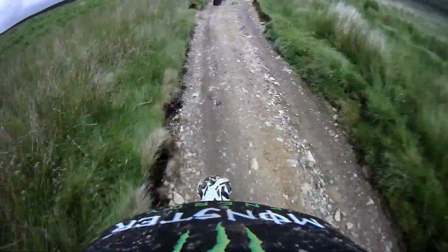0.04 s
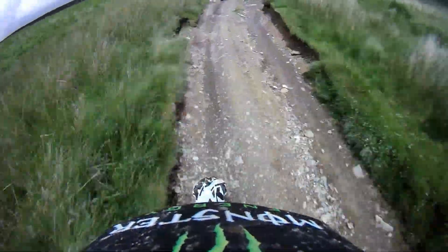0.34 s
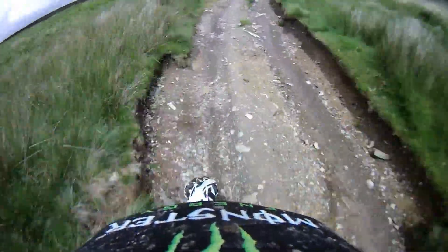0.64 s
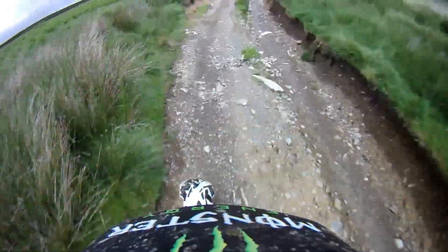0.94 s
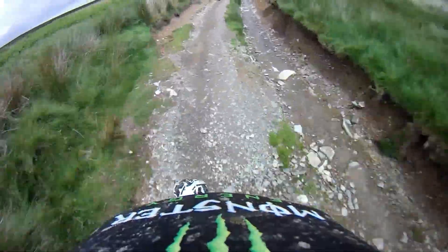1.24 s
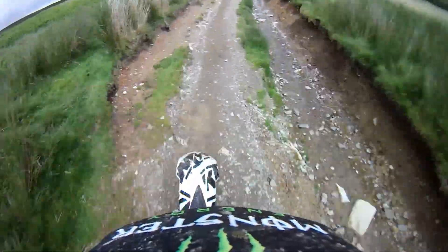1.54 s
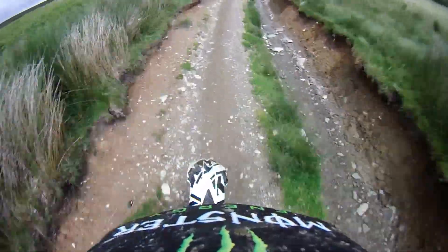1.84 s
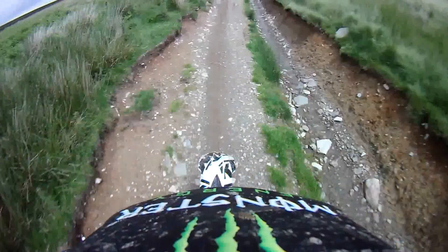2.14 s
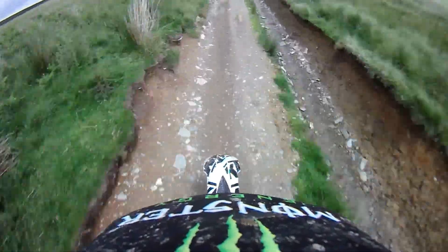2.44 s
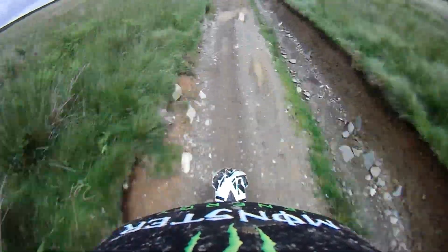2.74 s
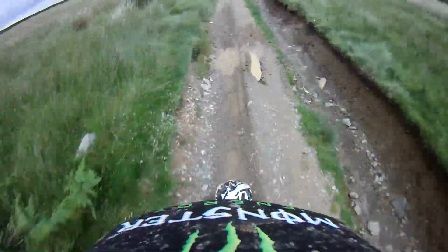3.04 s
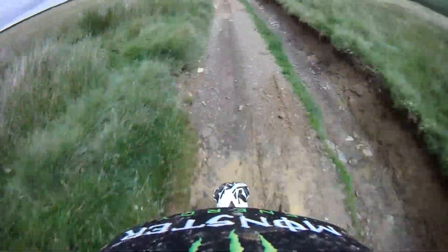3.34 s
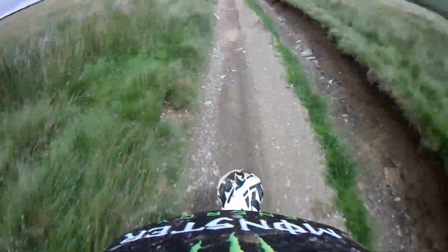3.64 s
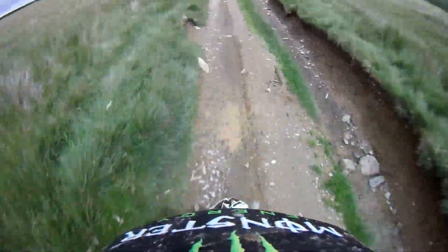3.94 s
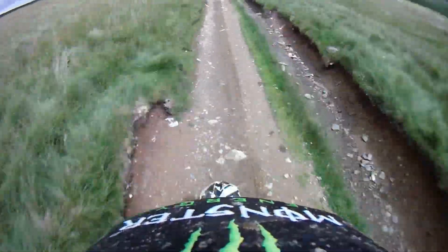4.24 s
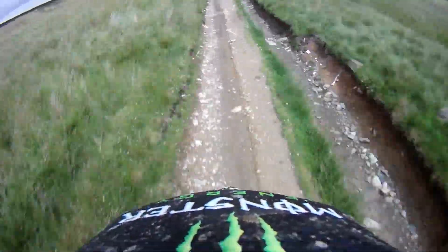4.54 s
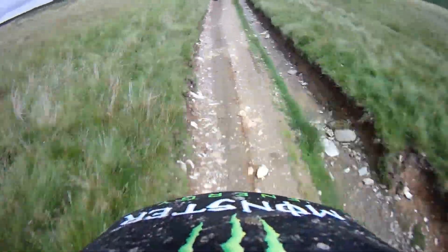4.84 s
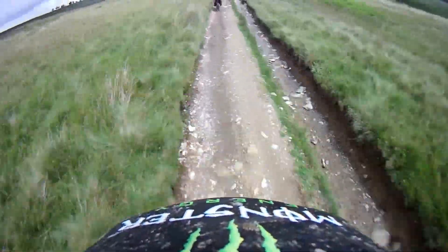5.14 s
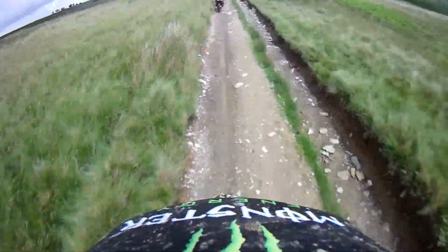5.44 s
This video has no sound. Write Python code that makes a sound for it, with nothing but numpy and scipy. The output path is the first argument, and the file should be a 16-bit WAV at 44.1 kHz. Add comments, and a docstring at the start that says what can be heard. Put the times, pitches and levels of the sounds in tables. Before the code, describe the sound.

A dirt bike engine coasts and growls through bursts of throttle, rattling over gravel with stone strikes and wind on the microphone.

```python
"""A single-cylinder four-stroke dirt bike rides down a gravel track, heard from the rider's helmet.
It coasts, takes two bursts of throttle and a small third one. One gas pulse per engine cycle drives
the resonances of exhaust and air box, which growl under the clatter of valve gear, piston and gears.
Impacts make the rest of the bike's noise: it rattles over rough ground, and stones and grit strike it.
Turbulent wind hisses and buffets the microphone."""
import sys
import numpy as np
from scipy import signal
from scipy.fft import rfft, irfft
from scipy.io import wavfile
from scipy.ndimage import uniform_filter1d

SR = 44100
rng = np.random.default_rng(int(sys.argv[2]) if len(sys.argv) > 2 else 0)


def store_wav(level_fs):
    """Save 16-bit WAV to argv[1]."""
    pcm = np.round(np.clip(np.atleast_2d(level_fs), -1, 1) * 32767)
    wavfile.write(sys.argv[1], SR, pcm.T.astype(np.int16))


N = 246519
TIME = np.arange(N) / SR
CRUISE_HZ = 47.9  # firing rate at cruising speed
GRIP_TWIST_S = 0.13

# engine speed: time_s, firing_rate_hz
FIRING_RATE = [(0, 44.1), (.3, 42.8), (.5, 41.3), (.8, 39.6), (1.0, 38.3), (1.2, 36.8), (1.4, 37.3),
               (1.68, 38.5), (1.782, 48.9), (1.845, 53), (1.926, 48.6), (2.005, 46), (2.106, 49.4),
               (2.182, 47.8), (2.3, 49.7), (2.42, 50.2), (2.5, 46.2), (2.62, 43), (2.8, 43.6), (3.22, 43),
               (3.32, 41.7), (3.45, 39.2), (3.75, 38), (3.85, 42.7), (3.914, 48.8), (4.01, 58),
               (4.085, 53.3), (4.32, 51.9), (4.398, 49.2), (4.478, 51.9), (4.616, 51.1), (4.76, 47),
               (4.95, 45.3), (5.11, 45), (5.2, 47.6), (5.3, 51), (5.42, 48.6), (5.59, 50)]


def amp(db):
    """Decibels to amplitude ratio."""
    return 10 ** (np.asarray(db) / 20)


def unit_rms(x):
    """Normalisation to an overall rms of 1."""
    return x / np.sqrt(np.mean(x ** 2) + 1e-20)


def steadied(x, size=2200):
    """Normalisation to a running rms of 1."""
    return x / np.sqrt(uniform_filter1d(uniform_filter1d(x ** 2, size), size) + 1e-12)


def coloured(x, spectrum, size=8192):
    """Minimum-phase filtering: each peak of the spectrum rings after the blow that excites it."""
    hz, db = np.transpose(spectrum)
    f = abs(np.fft.fftfreq(size, 1 / SR))
    log_gain = np.log(amp(np.interp(np.log(f + 1), np.log(hz), db)))
    response = np.exp(np.conj(signal.hilbert(log_gain)))
    ring = np.fft.ifft(response).real[:size // 2]
    return signal.oaconvolve(x, ring)[:len(x)]


def wander(rate_hz):
    """Slow random modulation: low-passed noise of rms 1."""
    f = np.fft.rfftfreq(N, 1 / SR)
    return unit_rms(irfft(rfft(rng.standard_normal(N)) * np.exp(-(f / rate_hz) ** 2), N))


def grains(per_s, spread_db):
    """Shot noise: tiny impacts of random time, sign and size."""
    size = amp(spread_db * np.minimum(rng.exponential(1, N), 4))
    return unit_rms(size * rng.choice([-1, 1], N) * (rng.random(N) < per_s / SR))


def add(mix, start_s, sound):
    """Superposition of a sound on the mix."""
    part = mix[round(start_s * SR):][:len(sound)]
    part += sound[:len(part)]


def curve(rows):
    """Linear interpolation through rows of time_s, value."""
    return np.interp(TIME, *np.transpose(rows))


def ramp(start_s, length_s):
    """A raised-cosine step from 0 to 1."""
    return np.sin(np.pi / 2 * np.clip((TIME - start_s) / length_s, 0, 1)) ** 2


def rise_and_fade(start_s, rise_s, fade_s):
    """A smooth onset with exponential decay."""
    return ramp(start_s, rise_s) * np.exp(-np.maximum(TIME - start_s, 0) / fade_s)


def swells(rows):
    """Gaussian rises and dips of level, in dB."""
    return sum(db * np.exp(-((TIME - middle_s) / half_s) ** 2) for middle_s, half_s, db in rows)


def crank(waver=0.005):
    """Phase is the integral of frequency: the cycle count of a crank that turns slightly unevenly."""
    return np.cumsum(curve(FIRING_RATE) * (1 + waver * wander(25.5))) / SR


def bursts():
    """Each burst of throttle is an envelope on exhaust and air box; hotter gas tunes the pipe higher."""
    # open_s, shut_s, closing_s, load_db, air_draw_db, boom_hold_s, pipe_build_s, pipe_pitch_ratio
    twists = [(1.365, 1.644, 0.17, -10, -14, .17, 2.6, .9), (1.634, 2.286, 0.27, -0.5, 2, 0.11, 1.2, 0.97),
              (3.788, 4.463, 0.22, -1.7, 0.5, 0.13, 1.9, .96), (5.123, 5.601, .2, -8, -14, .03, 0.11, 0.98)]
    for open_s, shut_s, closing_s, load_db, draw_db, hold_s, build_s, tuning in twists:
        opening = ramp(open_s, GRIP_TWIST_S) * (1 - ramp(shut_s, closing_s))
        age = np.maximum(TIME - open_s, 0)
        yield opening, age, amp(load_db), amp(draw_db), hold_s, build_s, tuning


def throttle(surge_peak_s=0.19, surge_width_s=0.1):
    """Load follows the throttle opening, with a surge of strain soon after the grip turns."""
    opened, load, surge = np.zeros((3, N))
    for opening, age, pull, *_ in bursts():
        opened += opening
        load += opening * pull
        surge += opening * pull * np.exp(-((age - surge_peak_s) / surge_width_s) ** 2)
    return np.minimum(opened, 1), load, surge


def roughness(opened, surge, shut=0.36, pulling=0.12, surging=0.03, per_hz_lost=0.0099):
    """Cyclic variation: firing is ragged with the throttle shut, more so at low speed, cleaner when open."""
    slow = per_hz_lost * np.maximum(CRUISE_HZ - curve(FIRING_RATE), 0)
    return np.clip((shut + slow) * (1 - opened) + pulling * opened + surging * surge, 0, 1)


def strokes(cycles, rough, uneven_db=6, puff_cycles=0.48):
    """A pulse train gives harmonics; a puff of turbulent gas in each cycle adds noise."""
    pulses = np.diff(np.floor(cycles), prepend=np.floor(cycles[0]))
    pulses *= amp(uneven_db * rough * wander(29))
    puffs = np.exp(-(cycles % 1) / puff_cycles) * rng.standard_normal(N)
    return (1 - rough) * unit_rms(pulses) + rough * unit_rms(puffs)


def chamber(x, echo_s, bounce=0.23):
    """All-pass reverberation: echoes spread each pulse in time and leave its spectrum level unchanged."""
    delay = np.exp(-2j * np.pi * np.fft.rfftfreq(N, 1 / SR) * echo_s)
    return irfft(rfft(x) * (delay - bounce) / (1 - bounce * delay), N)


def intake(cycles, rough, opened, held_db=-48.5, boom_db=-35, boom_fade_s=0.16):
    """Cavity resonance: each gulp of air excites the air box, which booms as the throttle opens."""
    # air box resonance: frequency_hz, gain_db
    air_box = [(60, -60), (150, -30.5), (205, -14.5), (238, -3), (268, 8.5), (290, -1), (330, -11),
               (500, -49), (1500, -67.5), (10000, -100)]
    # intake with the throttle shut: time_s, level_db
    idle_air = [(.1, -49.5), (.3, -55.5), (.55, -50.5), (1.35, -48), (2.52, -50), (2.7, -50), (3.0, -56),
                (3.3, -51), (3.58, -50.5), (3.75, -61), (4.8, -58), (5.2, -56)]
    level = amp(curve(idle_air)) * (1 - opened)
    for opening, age, _, draw, hold_s, _, _ in bursts():
        boom = opening * np.exp(-(np.maximum(age - hold_s, 0) / boom_fade_s) ** 2)
        level += opening * draw * (amp(held_db) + amp(boom_db) * boom)
    gulps = chamber(strokes(cycles, 0.59 * rough), echo_s=0.00674)
    return level * steadied(coloured(gulps, air_box))


def exhaust(cycles, rough, opened, load, surge, silencer_s=0.00553, limp=0.15):
    """Source and filter: firings bark and rasp at once, ring the pipe, and thump out of the silencer."""
    # silencer's growl under load and drone when coasting: frequency_hz, gain_db
    growl_spectrum = [(45, -24), (70, -17), (88, 2.5), (108, 2.5), (150, -19), (198, 6), (255, 3),
                      (310, -11), (430, -16.5), (600, -18.5), (1500, -49.5), (5000, -85), (12000, -102)]
    drone_spectrum = [(45, 0.5), (85, 10.5), (128, 2.5), (172, -1), (215, 6.5), (270, 1.5), (380, -25),
                      (700, -54.5), (1500, -40.5), (9000, -76)]
    # bark under load, rasp under strain, hollow pipe resonance: frequency_hz, gain_db
    bark_spectrum = [(200, -24), (340, 7.5), (440, 4.5), (580, -5), (700, 0), (860, -4.5), (1080, -24),
                     (1450, -11.5), (1900, -34.5), (5000, -59), (12000, -89)]
    rasp_spectrum = [(200, -49), (380, 7), (480, 5.5), (580, -2), (700, 5), (850, -26), (1200, -10),
                     (1480, 7.5), (1900, -10.5), (4000, -32), (10000, -78)]
    pipe_spectrum = [(150, -21), (300, -7), (400, -32), (495, 10), (560, -13), (800, -25), (2000, -76)]
    # drone while coasting: time_s, level_db
    drone_level = [(0, -51.5), (.6, -48.5), (1.17, -42.5), (1.45, -51), (2.65, -46.5), (3.15, -46.5),
                   (3.55, -50), (4.85, -49), (5.4, -44.5)]
    firings = strokes(cycles, rough)
    push = amp(-54.5) * (1 - opened) + amp(-39.5 - 3 * surge) * load
    growl = push * steadied(coloured(chamber(firings, silencer_s), growl_spectrum))
    blasts = strokes(cycles, rough=0.15, uneven_db=9, puff_cycles=0.2)
    excess_hz = curve(FIRING_RATE) - CRUISE_HZ
    bark = amp(-48 + 0.25 * excess_hz) * load * steadied(coloured(blasts, bark_spectrum))
    turbulence = strokes(cycles, rough=0.5, puff_cycles=0.7)
    rasp = amp(-46) * surge * steadied(coloured(turbulence, rasp_spectrum))
    ring = np.zeros(N)
    for opening, age, *_, build_s, tuning in bursts():
        pipe = [(hz * tuning, db) for hz, db in pipe_spectrum]
        ring += amp(-58) * opening * np.minimum(age / build_s, 1) * steadied(coloured(firings, pipe))
    limping = chamber(firings * (1 + limp * np.cos(np.pi * cycles)), silencer_s)  # every second one weak
    drone = amp(curve(drone_level) - 9 * opened) * steadied(coloured(limping, drone_spectrum))
    return growl + bark + rasp + ring + drone


def jostle(swing_db=1.2, rate_hz=7):
    """Amplitude modulation: the engine's voice swells and dips as the track jostles the bike."""
    return amp(swing_db * wander(rate_hz))


def clatter(cycles, load, surge, overrun_s=2.42):
    """Impact noise modulated by the cycle: valve gear, piston and gears tick, and bite under load."""
    # ticking, bite under load, chatter of slack gears: frequency_hz, density_db
    tick_spectrum = [(300, -2.5), (720, 2.5), (900, -4), (1130, -11), (1570, 4.5), (1900, -11.5),
                     (2250, -9), (2530, 5.5), (2950, -0.5), (4250, -3), (4900, -1.5), (6100, -4.5),
                     (7400, -16.5), (11000, -29), (15500, -50)]
    bite_spectrum = [(300, -20), (750, -6.5), (1080, -8), (1550, 0.5), (1850, -4), (2250, -3.5),
                     (2600, 3.5), (2950, 2.5), (3500, -2.5), (4300, -6), (4950, -1), (6100, -5),
                     (7400, -16.5), (11000, -32.5), (15500, -41)]
    lash_spectrum = [(500, -35), (1150, -15), (1570, 8.5), (2000, -7), (2600, -7), (4000, -14), (6000, -3),
                     (7500, -18), (12000, -37)]
    angle = 2 * np.pi * cycles
    beat = 1 + 0.049 * np.cos(angle) + 0.046 * np.cos(2 * angle)  # once a cycle, once a crank turn
    ticks = grains(per_s=8000, spread_db=2) * beat * amp(1.4 * wander(21))
    ticking = amp(-50.5) * unit_rms(coloured(ticks, tick_spectrum))
    excess_hz = curve(FIRING_RATE) - CRUISE_HZ
    strain = load * amp(-47.5 + surge + 0.48 * excess_hz)
    bite = strain * unit_rms(coloured(grains(per_s=14000, spread_db=2) * beat, bite_spectrum))
    slack = rise_and_fade(overrun_s, GRIP_TWIST_S, fade_s=0.83)  # throttle shut: wheel drives engine
    lash = amp(-54) * slack * unit_rms(coloured(grains(per_s=1600, spread_db=-3), lash_spectrum))
    return ticking + bite + lash


def rattle(surge, clump_db=1.47, snatch_db=5):
    """Clustered impacts of chain and gravel, louder on rough ground and when the drive snatches."""
    # chain and gravel: frequency_hz, density_db
    spectrum = [(100, -1.5), (400, -6), (850, 3.5), (1200, 2.5), (1500, 5), (1950, 4), (2450, 8),
                (2850, 9.5), (3400, 2), (4500, -2), (6000, -9), (7500, -28), (12000, -49)]
    # rough (+) and smooth (-) ground: middle_s, half_length_s, change_db
    ground = [(.42, .07, 2), (.81, 0.046, 5), (.885, 0.018, -13), (1.0, 0.1, 7.5), (1.25, 0.36, 6),
              (2.65, .14, 3), (2.92, 0.14, -5), (3.42, 0.13, -15), (4.2, 0.036, 6.5), (4.59, 0.07, 6.5),
              (4.8, 0.13, 6), (5.1, 0.1, -4)]
    hits = grains(per_s=4400, spread_db=1.5) * amp(clump_db * wander(41))
    return amp(-53.5 + swells(ground) + snatch_db * surge) * unit_rms(coloured(hits, spectrum))


def wind(lump_db=2.5, flutter_db=0.6):
    """Turbulence: lumpy low-frequency pressure on the microphone, and a thin hiss round the helmet."""
    # buffet and hiss: frequency_hz, density_db
    buffet_spectrum = [(5, 4.5), (14, 7), (30, -1), (55, -8), (100, -15), (160, -18.5), (300, -14),
                       (700, -49), (2000, -78.5)]
    hiss_spectrum = [(200, 7.5), (650, -6), (1050, -15), (1600, -5), (3000, -6), (6000, -19.5),
                     (8000, -19.5), (11000, -35.5), (15500, -33)]
    # gusts (+) and lulls (-): middle_s, half_length_s, change_db
    gusts = [(.8, 0.25, -1), (1.16, 0.038, 5), (1.64, 0.1, 7), (1.87, 0.039, -4), (2.88, 0.14, -14.5),
             (3.58, 0.069, -1), (4.47, 0.21, 5.5), (5.03, 0.061, -4.5), (5.5, 0.09, 6.5)]
    buffet = steadied(coloured(rng.standard_normal(N), buffet_spectrum)) * amp(lump_db * wander(9.9))
    flutter = amp(flutter_db * wander(17))
    hiss = unit_rms(coloured(rng.standard_normal(N), hiss_spectrum)) * flutter
    return amp(-45 + swells(gusts)) * buffet + amp(-54) * hiss


def stones(size=4096):
    """Modal ringing: flung stones crack on the bike, and the heavier ones excite a plastic panel."""
    # close strikes: start_s, crack_db, ring_db
    strikes = [(0.5841, -30.5, -60), (0.5916, -41, -51), (2.6252, -43, -30), (3.218, -33.5, -16.5),
               (3.307, -44, -34.5)]
    # crack of the contact: frequency_hz, density_db
    crack_spectrum = [(500, -23), (2200, -14), (3400, -2), (4100, 4), (4700, -1), (5300, 0), (6100, -6),
                      (7000, -19), (9500, -20), (12000, -33), (15500, -50)]
    # panel modes: pitch_hz, gain_db, t60_s
    panel_modes = [(344, -11, 0.016), (460, -11.5, 0.02), (630, -10.5, 0.015), (1532, -19, .022),
                   (1610, -1, 0.023), (1980, -12, 0.017), (2480, -1.5, 0.016), (2700, -10, .015),
                   (5870, -11, 0.011), (6760, 3, 0.0047)]
    out, t = np.zeros(N), np.arange(size) / SR
    contact = np.exp(-t / 0.0017) * (1 - np.exp(-t / 0.0002))
    ring = sum(amp(db - 60 * t / t60) * np.sin(2 * np.pi * hz * t) for hz, db, t60 in panel_modes)
    ring *= (1 - np.exp(-t / 0.0011)) ** 2
    for start_s, crack_db, ring_db in strikes:
        crack = unit_rms(coloured(rng.standard_normal(size), crack_spectrum)) * contact
        add(out, start_s, amp(crack_db) * crack + amp(ring_db) * ring)
    return out


def knocks(size=8192):
    """Brief contact gives a broad spectrum: loose parts and stones meet in damped bursts of noise."""
    # contacts: start_s, level_db, tilt_db_per_octave, decay_s
    contacts = [(0.802, -37, -3.5, 0.0059), (.826, -40, -3, 0.013), (0.91, -35, -5, 0.01),
                (0.9158, -32, 1.5, 0.015), (0.9603, -36.5, -3, 0.024), (0.996, -41, 1, 0.024),
                (1.024, -41, -2, 0.029), (1.043, -37, -1, 0.0083), (1.119, -37.5, -1, 0.0092),
                (1.148, -39, 2, 0.0044), (1.255, -39, -3, 0.018), (1.284, -42.5, -1, 0.013),
                (1.328, -42, 0, .008), (1.368, -41.5, -1, 0.0089), (2.195, -36, -5, 0.0042),
                (4.68, -35.5, -5.5, 0.0054), (4.769, -45, -7, .005)]
    # hard, crunching ring: frequency_hz, density_db
    spectrum = [(200, 2), (500, -16.5), (1000, -0.5), (1550, -0.5), (2000, 2), (2550, 13), (2900, 8.5),
                (3400, 0), (4500, 0.5), (6000, -8), (7500, -17), (12000, -42)]
    out, t = np.zeros(N), np.arange(size) / SR
    for start_s, level_db, tilt, decay_s in contacts:
        tilted = [(hz, db + tilt * np.log2(min(hz, 5000) / 2500)) for hz, db in spectrum]
        crunch = unit_rms(coloured(rng.standard_normal(size), tilted))
        envelope = np.exp(-t / decay_s) * (1 - np.exp(-t / 0.00038))
        add(out, start_s, amp(level_db) * crunch * envelope)
    return out


def air_puffs(size=8192):
    """One-sided pressure pulses: an eddy pushes on the microphone and lets go."""
    # eddies: start_s, peak_db, rise_s
    eddies = [(1.155, -31, 0.0073), (2.211, -29.5, 0.018), (3.572, -33, 0.014), (4.448, -25.5, 0.0079)]
    out, t = np.zeros(N), np.arange(size) / SR
    for start_s, peak_db, rise_s in eddies:
        pulse = (t / rise_s * np.exp(1 - t / rise_s)) ** 2
        add(out, start_s, amp(peak_db) * pulse)
    return out


def grit_spray():
    """Dense impacts merge into noise: a tyre throws short sprays of grit against the bike."""
    # sprays: start_s, level_db, rise_s, fade_s
    sprays = [(3.482, -45.5, 0.021, 0.057), (3.635, -51, 0.022, 0.037), (4.0, -48, 0.038, .05),
              (4.16, -49, .03, 0.044), (4.55, -43.5, 0.037, 0.057)]
    # grit on the bike: frequency_hz, density_db
    spectrum = [(500, -29), (2200, -4), (3600, 0), (5000, -2), (6300, -2), (7600, -17), (11000, -30),
                (15500, -45)]
    level = sum(amp(db) * rise_and_fade(start_s, rise_s, fade_s) for start_s, db, rise_s, fade_s in sprays)
    return level * unit_rms(coloured(grains(per_s=6900, spread_db=-1), spectrum))


def scene():
    """Superposition in open air: all sources travel with the microphone, so there is no Doppler shift."""
    # the grip eases for a moment: middle_s, half_length_s, change_db
    easings = [(1.99, 0.044, -2), (4.39, 0.043, 0)]
    cycles = crank()
    opened, load, surge = throttle()
    rough = roughness(opened, surge)
    voice = intake(cycles, rough, opened) * jostle()
    voice += exhaust(cycles, rough, opened, load, surge) * jostle()
    voice *= amp(swells(easings))
    track = rattle(surge) + knocks() + stones() + grit_spray()
    return (voice + clatter(cycles, load, surge) + track + wind() + air_puffs())[None]


def record(dry):
    """Band limiting: a linear-phase low-pass removes the highest treble."""
    cutoff_hz = 15650
    taps = signal.firwin(511, cutoff_hz, window=("kaiser", 9), fs=SR)
    return signal.oaconvolve(dry, taps[None], "same")


dry = scene()
out = record(dry)
store_wav(out)
```